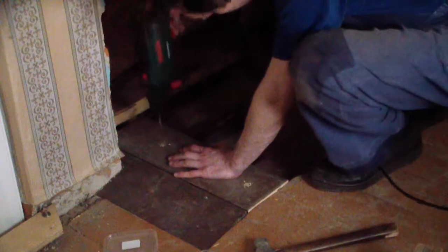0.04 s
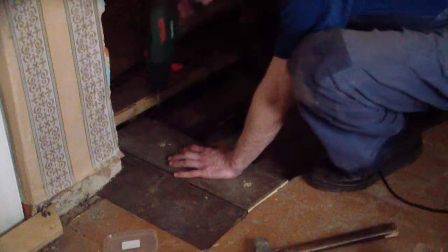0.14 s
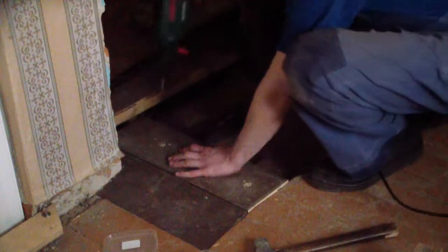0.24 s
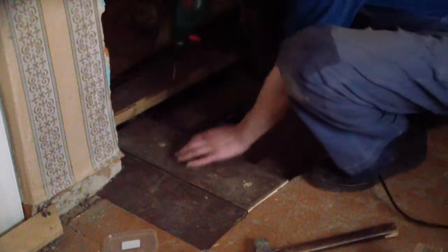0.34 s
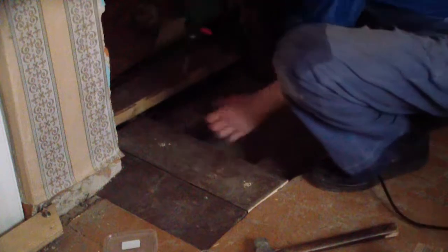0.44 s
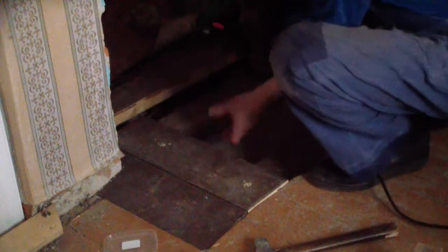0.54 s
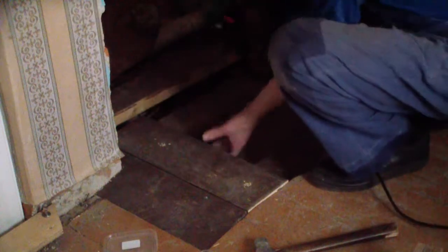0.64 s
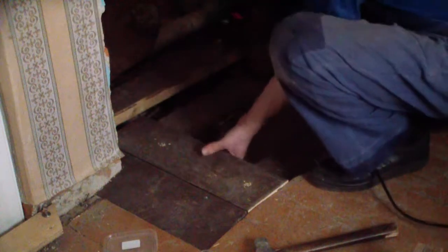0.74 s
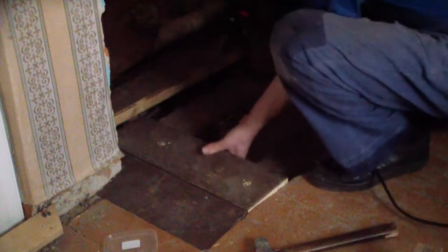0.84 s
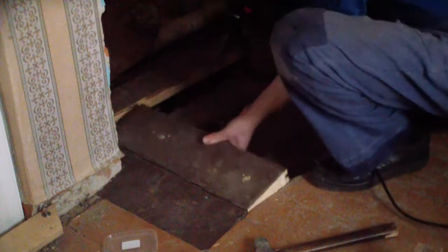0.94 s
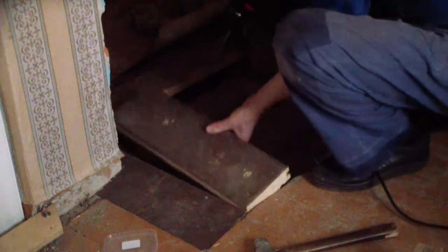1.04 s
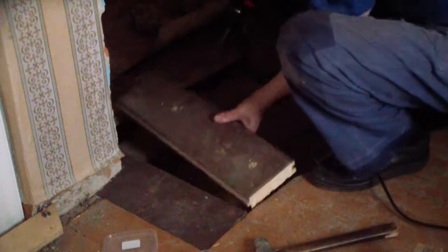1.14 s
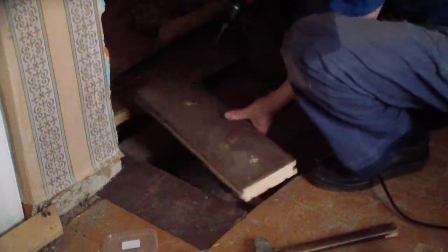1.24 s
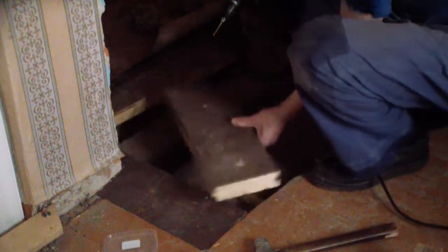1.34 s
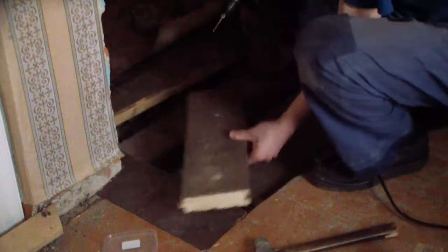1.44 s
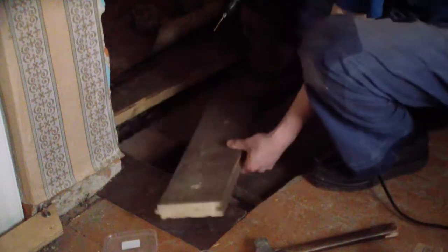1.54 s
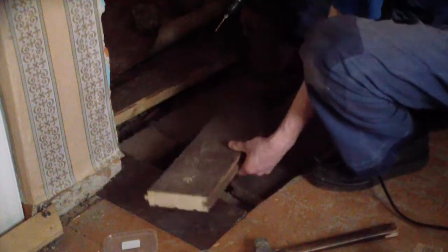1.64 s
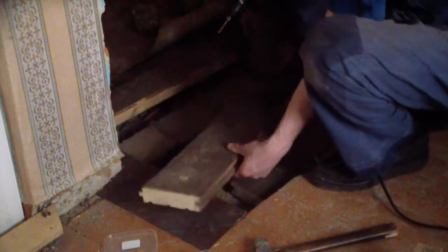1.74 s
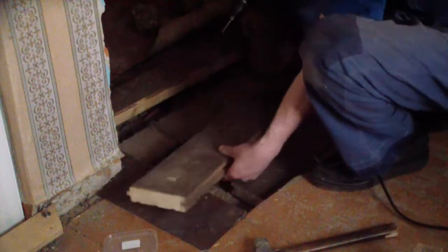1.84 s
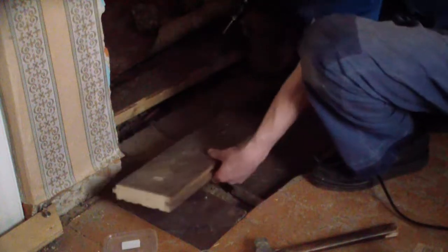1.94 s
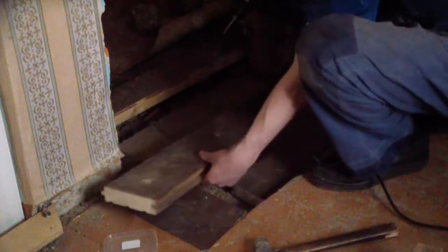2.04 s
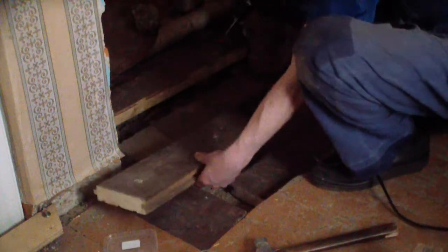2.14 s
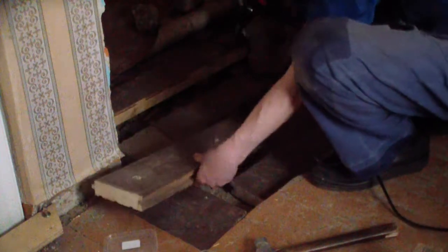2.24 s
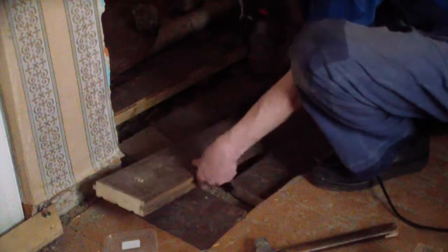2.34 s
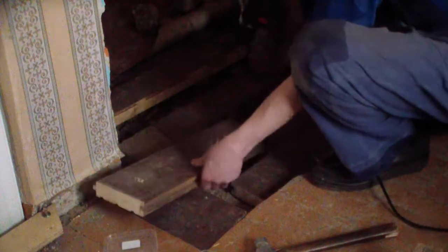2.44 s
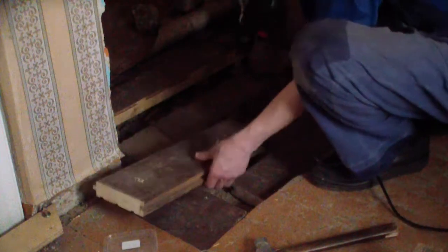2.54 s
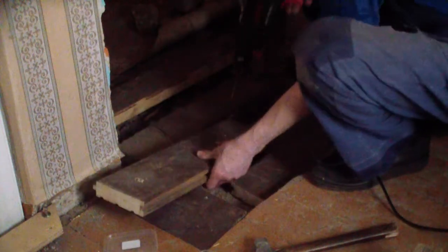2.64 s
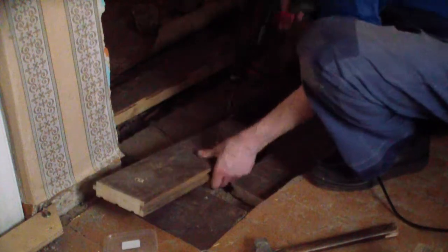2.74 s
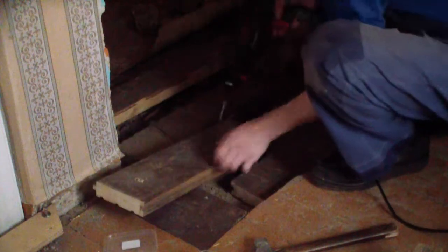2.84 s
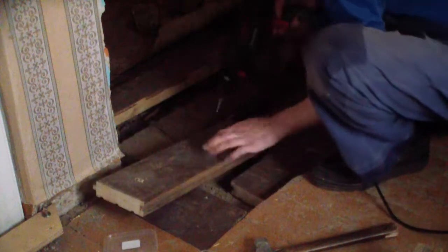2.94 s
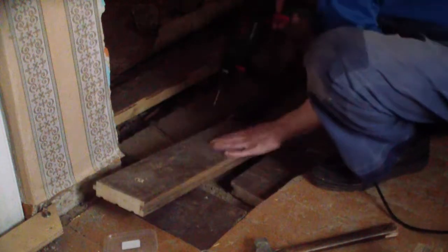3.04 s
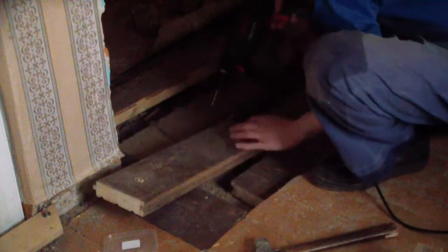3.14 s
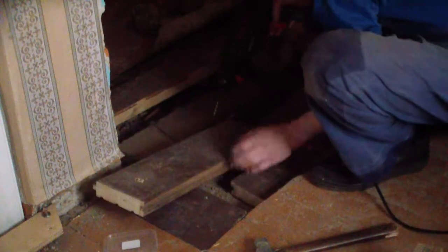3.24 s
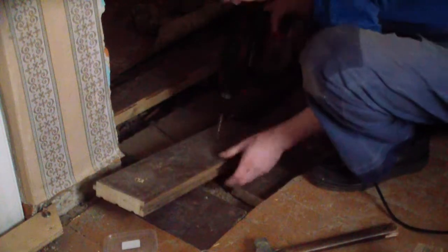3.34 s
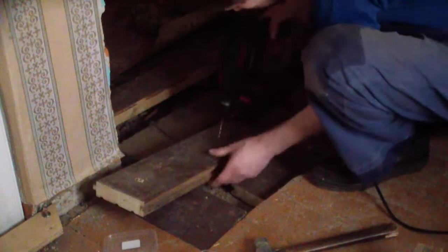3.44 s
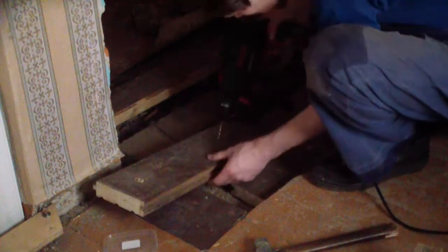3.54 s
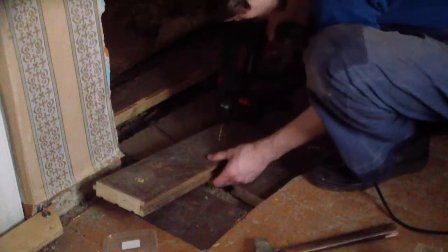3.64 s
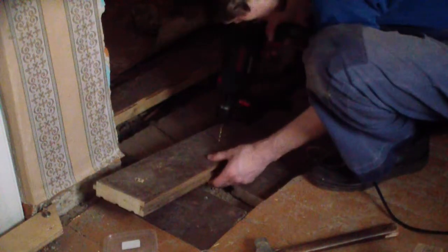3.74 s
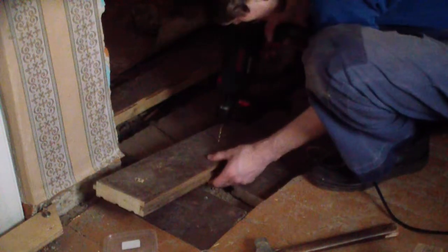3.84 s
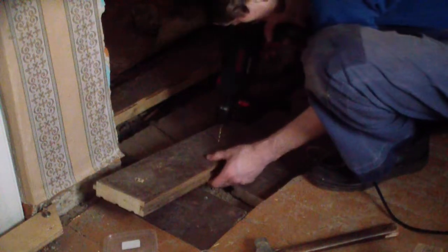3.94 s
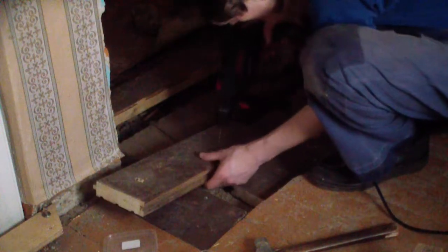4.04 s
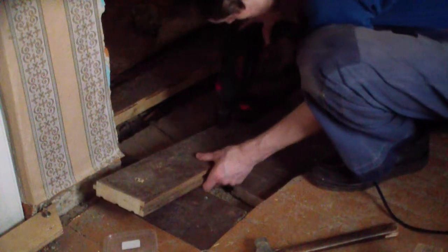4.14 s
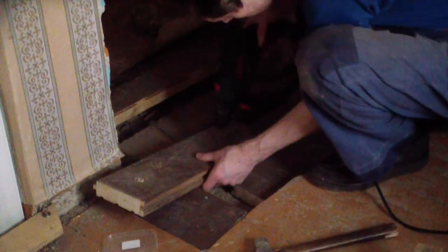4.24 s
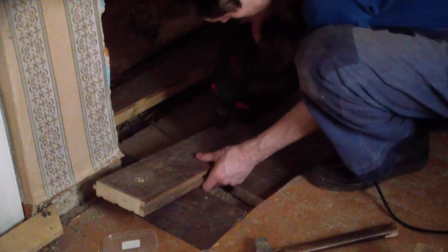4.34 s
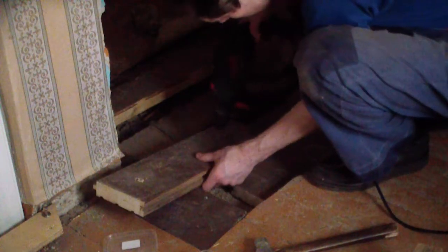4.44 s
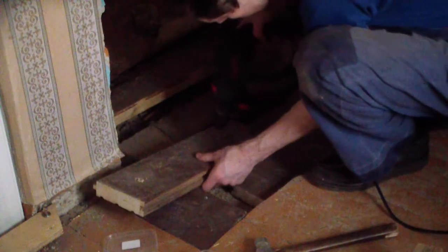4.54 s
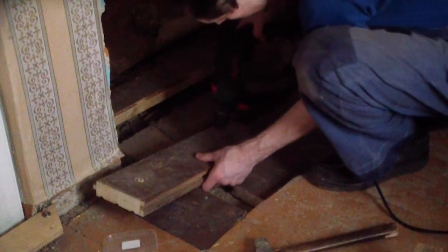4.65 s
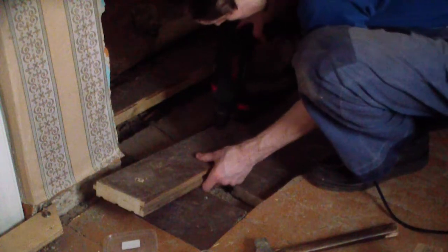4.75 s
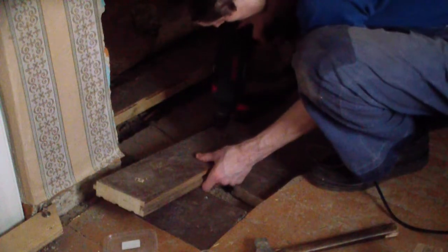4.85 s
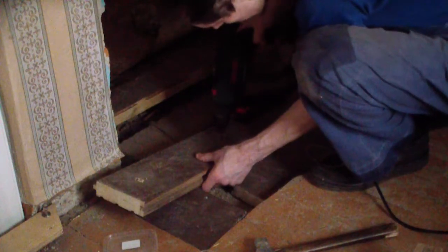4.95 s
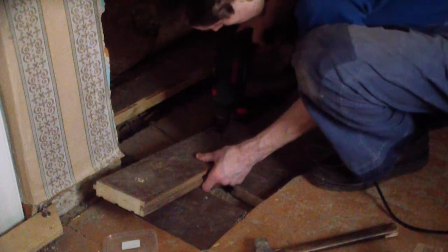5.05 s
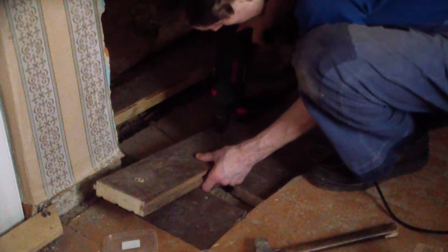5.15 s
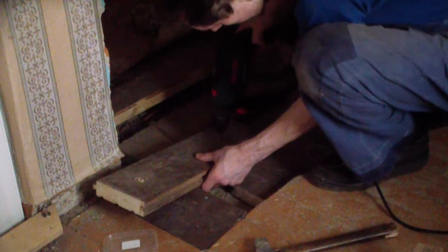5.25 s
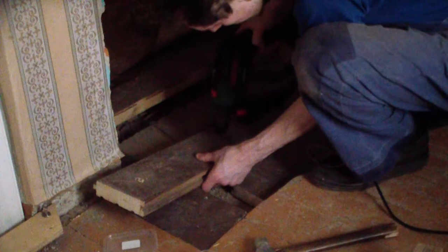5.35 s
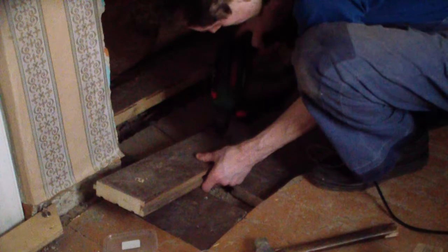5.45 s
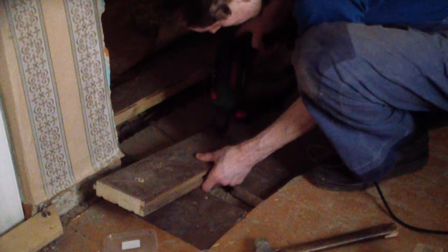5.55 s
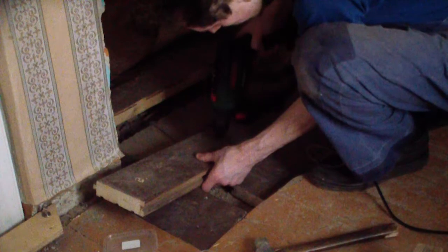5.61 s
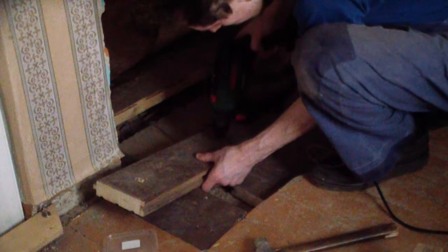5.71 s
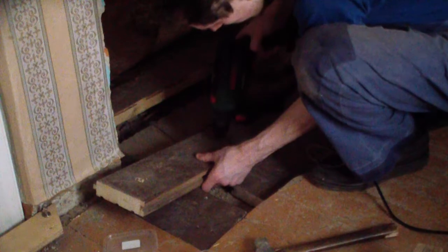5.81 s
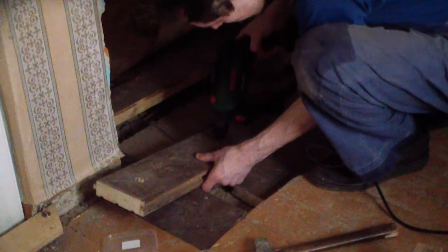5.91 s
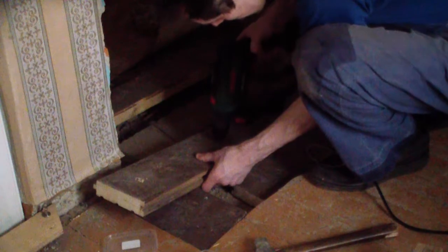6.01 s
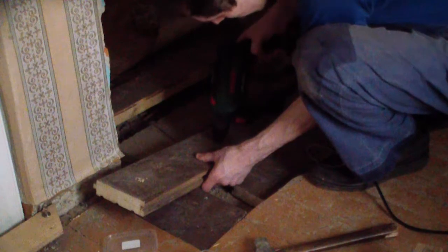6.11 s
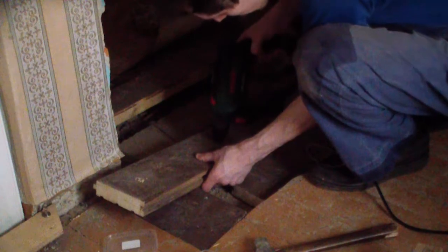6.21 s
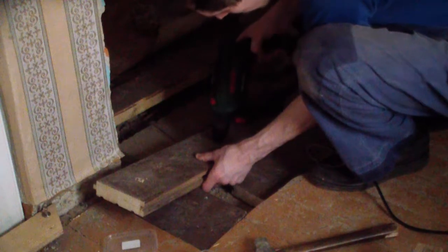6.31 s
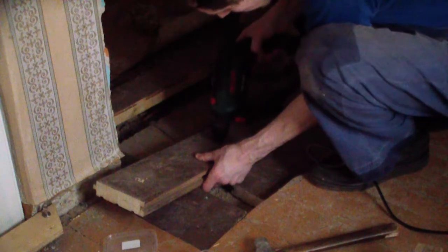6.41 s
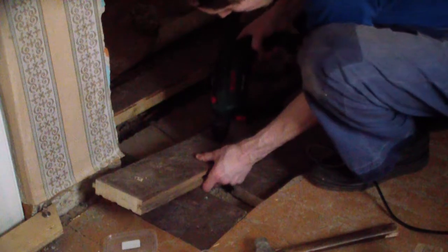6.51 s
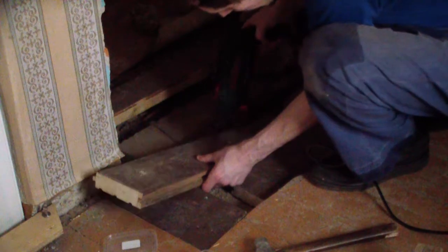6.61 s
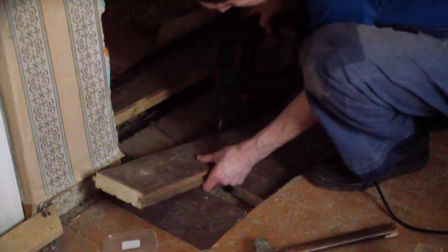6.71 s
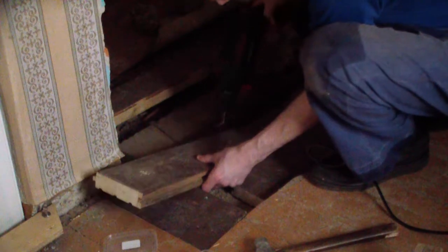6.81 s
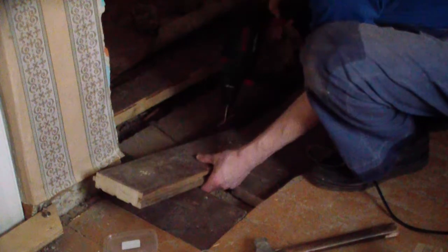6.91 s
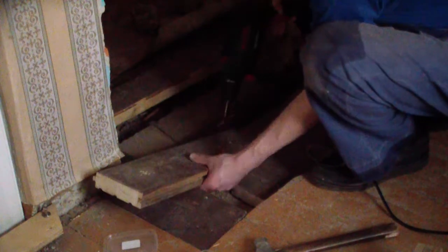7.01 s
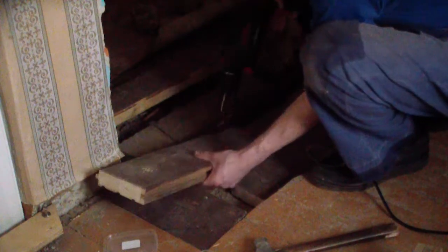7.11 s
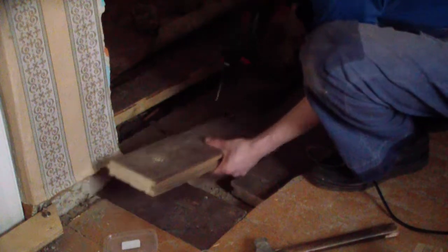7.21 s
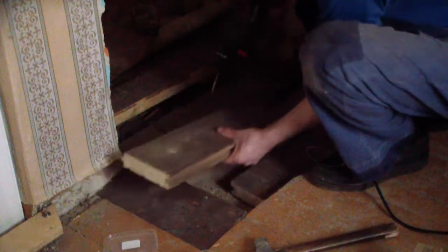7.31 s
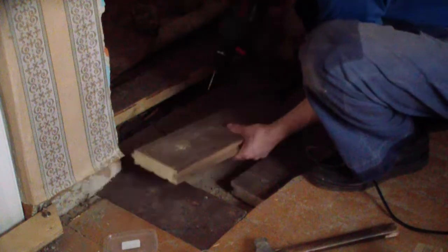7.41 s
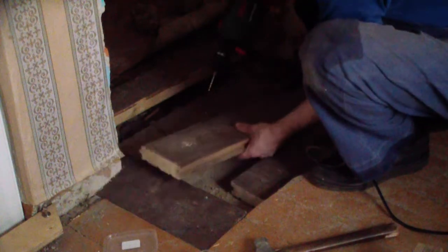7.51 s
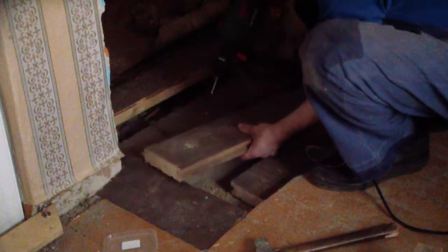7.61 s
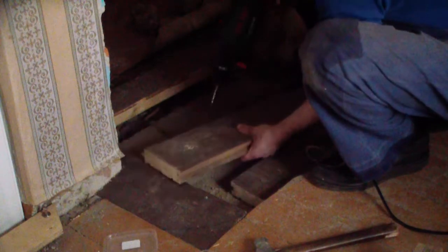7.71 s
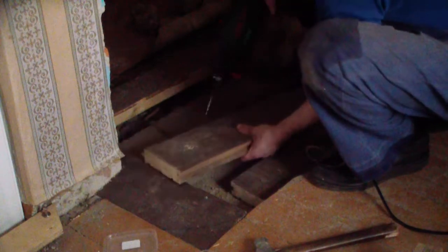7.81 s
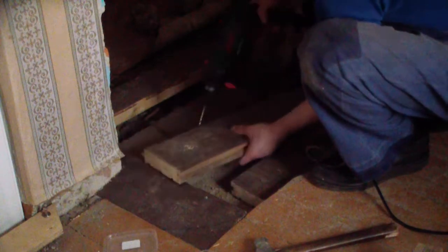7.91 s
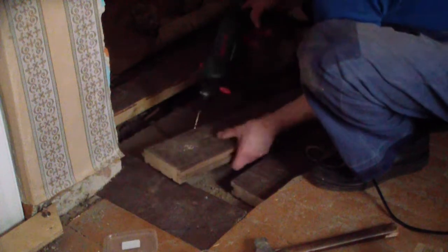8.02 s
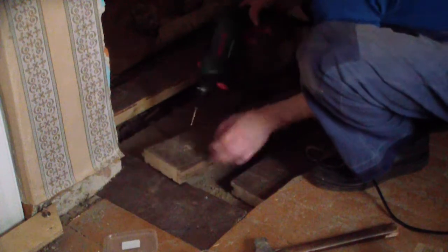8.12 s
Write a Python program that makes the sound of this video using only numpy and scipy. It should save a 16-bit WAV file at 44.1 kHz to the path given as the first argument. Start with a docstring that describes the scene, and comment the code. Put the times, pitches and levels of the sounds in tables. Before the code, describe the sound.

Wood is knocked and slid on a floor indoors before an electric drill runs briefly into it and whines down.

```python
"""Drilling a floorboard in a small room

Two microphones close to the work. A mains drill coasts to rest, its brushes squealing, while a short
board is lifted out, slid and knocked down on the wooden floor. The drill spins up: motor hum, whine
and fan rush all follow the shaft. The bit growls through the wood and the drill bumps down on it,
hard enough for the limiter to duck the motor. It coasts again as the board is set down."""
import sys
import numpy as np
from scipy import signal
from scipy.fft import rfft, irfft, next_fast_len
from scipy.io import wavfile
from scipy.ndimage import uniform_filter1d

SR = 44100
rng = np.random.default_rng(int(sys.argv[2]) if len(sys.argv) > 2 else 0)


def inscribe(sig):
    """Save sig as 16-bit PCM at rate SR to the path in sys.argv[1].

    A 1-D sig is mono; a 2-D sig holds one channel per row.
    Samples are clipped to [-1, 1] before scaling.
    """
    pcm = np.round(np.clip(np.atleast_2d(sig).T, -1, 1) * 32767)
    wavfile.write(sys.argv[1], SR, pcm.astype(np.int16))


N = 360297
T = np.arange(N) / SR
TRIGGER_S, RELEASE_S = 4.845, 6.812  # the trigger is held between these times
GEAR_RATIO = 14.02  # shaft turns per turn of the chuck
BAND_LIMIT_HZ = 15850


def amp(db):
    """Decibels to gain."""
    return 10 ** (np.asarray(db) / 20)

def unit(x):
    """Scales to an rms of 1."""
    return x / np.sqrt(np.mean(x ** 2) + 1e-20)

def read(points, hz):
    """Reads (f/Hz, value) points on a log-frequency axis."""
    f, value = np.transpose(points)
    return np.interp(np.log(hz + 1), np.log(f + 1), value)

def colour(x, points):
    """Filters by a spectrum of (f/Hz, level/dB) points."""
    size = next_fast_len(len(x))
    gain = amp(read(points, np.fft.rfftfreq(size, 1 / SR)))
    return irfft(rfft(x, size) * gain, size)[:len(x)]

def cut(x, hz, kind, order=2):
    """A low-pass or high-pass filter."""
    return signal.sosfilt(signal.butter(order, hz, kind, fs=SR, output="sos"), x)

def resonate(x, hz, width_hz):
    """Rings one resonance, at an rms of 1."""
    return unit(signal.lfilter(*signal.iirpeak(hz, hz / width_hz, SR), x))

def noise(size=N):
    """White noise."""
    return rng.standard_normal(size)

def wander(hz):
    """Random drift up to a given rate."""
    return unit(cut(noise(), hz, "low"))

def fade(s, decay_s):
    """1 until time s, then dying away."""
    return np.exp(-np.maximum(T - s, 0) / decay_s)

def add(mix, s, sound):
    """Lays a sound into the mix at time s."""
    part = mix[max(round(s * SR), 0):][:len(sound)]
    part += sound[:len(part)]

def modes(rows, size=32768, spread_db=2):
    """Rings a table of modes, in a random balance as if struck on a new spot."""
    t = np.arange(size) / SR
    weights = amp(spread_db * noise(len(rows))) * rng.choice([-1, 1], len(rows))
    x = sum(w * amp(db - 60 * t / t60) * np.sin(2 * np.pi * hz * t)
            for w, (hz, db, t60) in zip(weights, rows))
    return x / np.linalg.norm(x)

def tones(rows, turns, speed, swell_db=1.5):
    """Multiples of a rotation, each swelling on its own, silent above the band limit."""
    out = np.zeros(N)
    for multiple, db in rows:
        level = amp(db + swell_db * wander(5)) * (multiple * speed < BAND_LIMIT_HZ)
        out += level * np.sqrt(2) * np.sin(2 * np.pi * (multiple * turns + rng.random()))
    return out

def jolt(chuck_turns, decay_turns=0.35):
    """A push that dies away within each turn of the chuck; its mean is 1."""
    push = np.exp(-(chuck_turns % 1) / decay_turns)
    return push / push.mean()


# The empty room at the microphones: f/Hz, relative level/dB
ROOM_TONE = [(15, -34), (25, -4), (107, -5), (126, -9), (161, -6), (371, -10), (572, -15.5), (955, -19.5),
             (1390, -20.5), (2150, -22), (15800, -33.5)]
def room_tone():
    """A faint, low, steady background."""
    return amp(-47.5) * unit(colour(noise(), ROOM_TONE))

# How long the room and its floor ring: f/Hz, t60/s
RING_TIMES = [(100, 0.27), (400, 0.43), (1500, 0.63), (5000, 0.71), (14000, 0.36)]
def tail(size=32768):
    """Dense ringing of energy 1 that lasts longest around 5 kHz."""
    hz, t, spectrum = signal.stft(noise(size), SR, nperseg=256)
    decay = amp(-60 * t / read(RING_TIMES, hz)[:, None])
    x = signal.istft(spectrum * decay, SR, nperseg=256)[1][:size]
    return x / np.linalg.norm(x)

def room(x, wet_db):
    """Direct sound plus reflections off the nearby walls, at constant power."""
    return (x + amp(wet_db) * signal.oaconvolve(x, tail())[:N]) / np.hypot(1, amp(wet_db))

# Friction on the grain: f/Hz, relative level/dB
GRAIN_HISS = [(200, 1), (700, -3.5), (2000, -4.5), (5500, -5), (8200, -5), (12000, -8.5), (16000, -14)]
# Strokes: t/s, nominal length/s, hiss level/dB, board ring level/dB, low-pass f/Hz
SLIDE_STROKES = [(0.406, 0.2, -37, -50, 6000), (0.944, 0.11, -35, -45, 3420), (2.085, 0.12, -47, -46, 4000),
                 (2.169, 0.11, -46, -43, 4000), (2.617, 0.47, -49, -63, 6000),
                 (2.859, 0.073, -40.5, -58, 8000), (3.066, 0.068, -39, -40.5, 15000),
                 (3.225, 0.27, -50.5, -60, 5000), (3.83, 0.057, -73, -57, 5000),
                 (4.066, 0.11, -49.5, -48, 5000)]
def slides():
    """The board or a hand slides on wood, hissing and stirring the board's bending mode."""
    out = np.zeros(N)
    hiss = unit(colour(noise() * (1 + 0.18 * wander(210)), GRAIN_HISS))
    ring = resonate(noise(), hz=1590, width_hz=60)
    for s, length, hiss_db, ring_db, top_hz in SLIDE_STROKES:
        rub = amp(hiss_db) * unit(cut(hiss, top_hz, "low", order=1)) + amp(ring_db) * ring
        out += rub * np.interp(T, s + length * np.array([0, .18, .5, 1.57]), [0, 1, 1, 0])
    return out

# Weight on the floor: t/s, length/s, level/dB, top f/Hz
FLOOR_THUDS = [(0.39, 0.15, -34, 490), (0.91, 0.07, -40, 380), (2.855, 0.093, -36, 71),
               (2.858, .075, -35, 260), (3.61, 0.1, -47, 70), (3.691, 0.1, -37.5, 75),
               (4.182, 0.12, -48.5, 900), (4.85, 0.2, -36, 160), (5.051, 1.3, -47, 128),
               (6.066, 0.13, -29.5, 275), (6.64, 0.14, -29, 85), (6.642, 0.12, -12.5, 300)]
def thuds():
    """The floor gives with a dull thud under shifting weight."""
    out = np.zeros(N)
    for s, length, db, top_hz in FLOOR_THUDS:
        rumble = cut(noise(SR), top_hz, "low", order=4)
        push = unit(cut(rumble, top_hz / 2, "high"))[:int(length * SR)]
        add(out, s, amp(db) * push * signal.windows.tukey(len(push), .7))
    return out

# What a scrape rings: f/Hz at a pitch factor of 1, width/Hz, relative level/dB
SCRAPE_RESONANCES = [(790, 20, -15), (844, 18, 1), (960, 38, 3.5), (1174, 15, 6.5), (2130, 64, -5),
                     (2350, 83, -8), (2710, 100, -5), (3440, 140, -13), (4620, 210, -6.5), (5240, 160, -15),
                     (5300, 140, -26), (8260, 400, -29)]
# Two short hissing rasps, each ringing narrow resonances: t/s, length/s, level/dB, pitch factor, high-pass f/Hz
RINGING_RASPS = [(2.866, .06, -39, 1.035, 2300), (3.396, .098, -28, 1.0, 550)]
def scrapes(slips_per_s=900, rise_s=.011, fade_db_per_s=100, stop_s=.012, size=16384):
    """Quick uneven slips excite narrow resonances, hardest at the start of the stroke."""
    out, t = np.zeros(N), np.arange(size) / SR
    for s, length, db, pitch, low_hz in RINGING_RASPS:
        slips = unit(noise(size) * (rng.random(size) < slips_per_s / SR)) + 0.94 * noise(size)
        ring = sum(amp(mode_db) * resonate(slips, hz * pitch, width_hz)
                   for hz, width_hz, mode_db in SCRAPE_RESONANCES)
        stroke = np.minimum(t / rise_s, 1) * amp(db - fade_db_per_s * t)
        stroke *= np.exp(-np.maximum(t - length, 0) / stop_s)
        add(out, s, stroke * unit(cut(ring, low_hz, "high")))
    return out

# Grit, trigger, gears taking up play, splinters, chuck on board: t/s, level/dB, low f/Hz, top f/Hz
SNAPS = [(.379, -23.5, 1500, 12000), (.495, -29, 2000, 12000), (1.985, -36, 1500, 8900),
         (4.730, -26.5, 1990, 14000), (4.843, -15, 1190, 7900), (4.854, -19, 1500, 9000),
         (4.863, -12.5, 1200, 8900), (4.873, -10.5, 1480, 8900), (4.882, -16, 1500, 9000),
         (4.892, -10, 2000, 11100), (5.082, -12, 1200, 4500), (5.902, -10, 500, 5000),
         (6.647, -4, 1200, 1800)]
def clicks(t60_s=.035, size=4096):
    """Brief snaps of hard parts, each in its own band."""
    out, t = np.zeros(N), np.arange(size) / SR
    for s, db, low_hz, top_hz in SNAPS:
        band = cut(cut(noise(size), low_hz, "high"), top_hz, "low", order=4)
        add(out, s, amp(db - 60 * t / t60_s) * unit(band))
    return out

# Modes of the wooden floor: f/Hz, relative level/dB, t60/s
FLOOR_MODES = [(103.6, 0, 0.42), (143, 4, 0.25), (183.3, 1.5, 0.4), (236.6, -6, 0.2), (295, -2, 0.39),
               (325, 2, 0.26), (413.7, -0.5, 0.32), (480, 2.5, 0.15), (587, -1.5, 0.36), (694, -9, 0.57)]
# The dense ringing between them: f/Hz, relative level/dB
FLOOR_BODY = [(40, -21), (90, -5), (160, 1.5), (450, -2), (700, -7.5), (1000, -14.5), (1700, -15.5),
              (3000, -23.5), (8000, -19), (15000, -12.5)]
def floor_strike(hard_hz, low_hz):
    """One contact rings the floor; a soft one is dull, a brief one leaves the joists still."""
    blow = tail()
    blow[0] += 0.27  # the contact itself, ahead of its ringing
    body = colour(np.pad(blow, (256, 0)), FLOOR_BODY)[256:]
    ring = body / np.linalg.norm(body) + amp(-4) * modes(FLOOR_MODES)
    dulled = amp(1) * cut(ring, hard_hz, "low") + amp(-9) * cut(ring, hard_hz, "low", order=1)
    return cut(dulled, low_hz, "high")

# Modes of the loose board: f/Hz, relative level/dB, t60/s
BOARD_MODES = [(1573, 7, 0.27), (1590, -3, 0.34), (1985, -4.5, 0.16), (2620, -14, 0.28)]
# Blows: t/s, relative floor level/dB, low-pass f/Hz, high-pass f/Hz, relative board level/dB
BOARD_BLOWS = [(.964, -24, 500, 195, -52), (.976, -15.5, 800, 190, -33), (1.011, -15, 623, 120, -35),
               (1.021, -20, 500, 120, -47), (1.033, -17.5, 420, 100, -44), (1.040, -15, 330, 90, -50),
               (1.082, -19.5, 355, 110, -48), (2.008, -16.5, 1680, 295, -26.5), (2.072, -21, 800, 300, -45),
               (2.119, -20.5, 240, 80, -50), (2.313, -12, 2530, 350, -19.5), (2.371, -11.5, 480, 130, -36),
               (2.391, -13.5, 383, 100, -48), (2.416, -16, 1000, 170, -21), (2.453, -16.5, 590, 150, -31),
               (2.528, -27.5, 740, 200, -43), (6.647, -1.5, 1500, 259, -22), (6.658, -3, 700, 300, -37),
               (6.680, -9, 480, 115, -38), (6.697, -10.5, 650, 131, -40), (6.733, -14.5, 600, 150, -45),
               (7.621, -17, 403, 150, -50), (7.640, -14.5, 400, 220, -50), (7.718, -14.5, 387, 130, -50),
               (7.733, -15.5, 300, 100, -50), (7.767, -16, 406, 130, -50), (7.790, -23, 343, 140, -48)]
def knocks():
    """The board lands, rocks and settles; each blow rings the floor and the board itself."""
    out = np.zeros(N)
    for s, floor_db, hard_hz, low_hz, board_db in BOARD_BLOWS:
        floor = amp(floor_db + 27) * floor_strike(hard_hz, low_hz)
        add(out, s, floor + amp(board_db + 25.5) * modes(BOARD_MODES))
    return out

# Course of the squeal: t/s, f/Hz, relative level/dB
BRUSH_SQUEAL = [(0.55, 1275, -44), (0.574, 1300, -42), (0.586, 1220, -47), (0.604, 1298, -42),
                (0.804, 1243, -44), (0.836, 1314, -49), (0.886, 1214, -51), (0.918, 1289, -45),
                (0.94, 1350, -59)]
def brush_squeal():
    """The brushes stick and slip on the commutator as the rotor stops."""
    times, hz, db = np.transpose(BRUSH_SQUEAL)
    cycles = np.cumsum(np.interp(T, times, hz) * (1 + 0.041 * wander(160))) / SR
    gate = np.interp(T, [times[0] - .02, times[0], times[-1], times[-1] + .02], [0, 1, 1, 0])
    stutter = np.maximum(1 + 0.3 * wander(32), 0)
    return gate * amp(np.interp(T, times, db) + 2) * stutter * np.sin(2 * np.pi * cycles)

def coast(t, start_hz, friction_hz_per_s, drag_per_s=.14):
    """Shaft speed t seconds into a coast: friction and air drag bring it to rest."""
    offset = friction_hz_per_s / drag_per_s
    return np.maximum((start_hz + offset) * np.exp(-drag_per_s * t) - offset, 0)

# The shaft's speed while the bit cuts: t/s, f/Hz
LOADED_SPEED = [(5.27, 517.8), (5.462, 507.7), (5.72, 508.8), (6.058, 518.4), (6.242, 510.0),
                (6.398, 519.1), (6.62, 516.1), (6.81, 527.6)]
def shaft_speed(free_hz=527, spin_up_s=.104):
    """Turns a second: the shaft coasts to rest, runs up, sags under load and coasts again."""
    first_coast = coast(T, start_hz=241, friction_hz_per_s=277)
    run_up = free_hz * (1 - fade(TRIGGER_S, spin_up_s))
    loaded = np.interp(T, *np.transpose(LOADED_SPEED))
    last_coast = coast(T - RELEASE_S, free_hz, friction_hz_per_s=261)
    return first_coast + np.minimum.reduce([run_up, loaded, last_coast])

def drill_level(speed):
    """The drill is louder the faster it turns, and drops a little once the trigger is let go."""
    return amp(-22.75 + 2.5 * fade(RELEASE_S, .11)) * (speed / speed.max()) ** 0.76

# Close to the drill, each as f/Hz, relative level/dB: fan and gears at full speed, slow gears, sparks
FAN_RUSH = [(35, -42), (60, -17), (436, -8.5), (576, -9), (663, -5.5), (1030, -9), (1330, -12), (1570, -4),
            (1760, -8.5), (3090, -7.5), (3810, -7.5), (7000, -7.5), (10900, -16), (12500, -10.5),
            (14700, -32), (15800, -35)]
SLOW_GEARS = [(88, -49), (150, -36), (244, -5), (321, 0), (598, -10.5), (1090, 3), (1410, 0), (2300, 1.5),
              (3200, 5.5), (4040, -5), (4910, -3), (5960, -9), (11800, -9.5), (15800, -19)]
BRUSH_SPARKS = [(500, -30), (2500, -7), (5000, 0), (10500, 0), (12800, 7), (13700, -11), (15800, -16)]
def fan_gears_brushes(speed):
    """Fan rush at speed, gear rattle when slow and brush hiss under power, heard in the room."""
    chuck_turns = np.cumsum(speed) / SR / GEAR_RATIO
    fast = (speed / speed.max()) ** 2.6
    teeth = unit(noise() * (rng.random(N) < 5 * speed / SR))
    rush = unit(noise() + 0.5 * teeth) * (1 + 0.049 * wander(45))
    rush *= .95 + .05 * jolt(chuck_turns)  # loose teeth clatter harder once a turn
    fan = amp(-2.5) * np.sqrt(fast) * unit(colour(rush, FAN_RUSH))
    gears = amp(-4.5) * np.sqrt(1 - fast) * unit(colour(rush, SLOW_GEARS))
    powered = (T > TRIGGER_S) * fade(RELEASE_S, .11)
    brushes = amp(-6) * fast * powered * unit(colour(noise(), BRUSH_SPARKS))
    return room(drill_level(speed) * (fan + gears + brushes), wet_db=-2.5)

# Rotor hum, then the whine of armature slots and commutator bars: shaft multiple, relative level/dB
ROTOR_HUM = [(1, -7), (2, -1), (3, -3.5), (4, -3), (5, -3.5), (6, -3.5), (7, -4), (9, -12), (10, -11),
             (18, -14), (20, -14)]
SLOT_WHINE = [(4, -18), (8, -8), (16, -10.5), (20, -22), (24, -9.5), (26, -22), (28, -20), (32, -12),
              (40, -14), (44, -23), (48, -14.5), (56, -14.5), (64, -15), (72, -17), (80, -19)]
# Resonances of the plastic housing, which the whine sweeps through: f/Hz, relative level/dB
HOUSING_RESPONSE = [(600, -4.5), (900, -7), (1080, 9.5), (1300, -1), (1700, -3), (2300, -3), (2750, 2),
                    (3100, 6.5), (3350, 2), (3900, -3), (4300, 2.5), (4600, -1), (5000, 4), (5500, -1),
                    (7000, -3), (8300, 3.5), (10000, -3), (12400, 2), (15000, -1)]
def motor(speed, turns, fan_blades=13, whine_full_hz=160):
    """The rotor hums under power; blade tone and whine come forward with the current off."""
    share = speed / speed.max()
    fast = share ** 1.8
    powered = (T > TRIGGER_S) * fade(RELEASE_S, .2)
    hum = amp(-10.5) * fast * powered * tones(ROTOR_HUM, turns, speed)
    blades = cut(tones([(fan_blades, -8)], turns, speed), 4000, "high", order=3)
    blades *= 1 - powered * (1 - .7 * fast)
    whine = amp(-1) * colour(tones(SLOT_WHINE, turns, speed), HOUSING_RESPONSE)
    whine *= share ** .25 * np.minimum(speed / whine_full_hz, 1)
    whine *= 1 - powered * (.7 - .35 * share)
    flutter = .75 + .25 * jolt(turns / GEAR_RATIO) + .33 * wander(110)
    return drill_level(speed) * (hum + blades + whine) * flutter

# The bit's way through the wood: t/s, relative growl level/dB, relative chatter level/dB
BIT_FEED = [(5.05, -38, -43), (5.088, -34, -33.5), (5.22, -37, -40), (5.434, -35, -38.5),
            (5.496, -29, -35.5), (5.604, -30, -35.5), (5.674, -34, -39), (5.696, -33, -32),
            (5.722, -27, -30), (6.138, -26, -26), (6.216, -33.5, -30.5), (6.448, -21.5, -38),
            (6.496, -23, -45), (6.62, -31.5, -43)]
# The cutting growl, then the lower chatter: chuck multiple, relative level/dB
GROWL_TONES = [(16, -1), (44, -16)]
CHATTER_TONES = [(9, 3), (11, -11), (13, 2.5)]
# What the bit rings, the board's bending mode and a rasp: f/Hz, width/Hz, relative level/dB
BIT_RATTLE = [(1590, 95, -32), (3020, 320, -31.5)]
def bit(speed, turns, grab_s=6.71, grab_width_s=.057, grab_db=20, breakthrough_s=6.75):
    """The bit growls, chatters and throws chips, then grabs just before it breaks through."""
    chuck_turns, chuck_hz = turns / GEAR_RATIO, speed / GEAR_RATIO
    boring = (T > TRIGGER_S) * (speed / speed.max()) ** 1.8 * fade(breakthrough_s, .025)
    grab = amp(grab_db * np.exp(-((T - grab_s) / grab_width_s) ** 2))
    times, growl_db, chatter_db = np.transpose(BIT_FEED)
    feed = grab * amp(np.interp(T, times, growl_db))
    edges = chuck_turns + .003 * wander(16)  # the cutting edges catch unevenly on the grain
    growl = amp(1) * feed * tones(GROWL_TONES, edges, chuck_hz, swell_db=0) * (1 + 0.47 * wander(45))
    chatter = amp(np.interp(T, times, chatter_db) - 4.5)
    chatter *= tones(CHATTER_TONES, edges, chuck_hz, swell_db=0)
    chips = amp(-12.5) * feed * unit(signal.oaconvolve(noise(), modes(FLOOR_MODES))[:N])
    # the wobbling bit rattles against the board once a turn
    rattle = sum(amp(db) * resonate(noise() * (.5 + jolt(chuck_turns)), hz, width_hz)
                 for hz, width_hz, db in BIT_RATTLE)
    return boring * (growl + chatter + chips + rattle)

# Stereo width of the nearby work, then of the room tone: f/Hz, side minus mid level/dB
WORK_WIDTH = [(25, -12), (60, -22), (110, -41), (380, -31), (700, -20), (1290, -17), (2380, -16),
              (4400, -9), (8120, -3), (15000, -7)]
ROOM_WIDTH = [(60, -5.5), (150, -8.5), (380, -8), (950, -5), (2380, -2.5), (5980, -1), (15000, -2)]
# Balance of the microphones: f/Hz, left minus right level/dB
MIC_BALANCE = [(100, 0.65), (2000, 0.5), (5000, 1.2), (14000, 1.4)]
def scene():
    """All sources reach two closely spaced microphones, which differ mostly in the treble."""
    speed = shaft_speed()
    turns = np.cumsum(speed * (1 + 0.0018 * wander(72))) / SR
    running, cutting = motor(speed, turns), bit(speed, turns)
    near = room(running, wet_db=-4) + room(cutting + brush_squeal(), wet_db=-9.5)
    near += room(scrapes(), wet_db=-8) + room(clicks(), wet_db=0.5)
    near += room(slides() + thuds(), wet_db=-5) + knocks()
    scatter = noise(4096) * np.exp(-np.arange(4096) / 1200)  # smears the phase for the side signal
    scattered = amp(0.5) * signal.oaconvolve(near, scatter / np.linalg.norm(scatter))[:N]
    mid = near + fan_gears_brushes(speed) + room_tone()
    side = colour(scattered + fan_gears_brushes(speed), WORK_WIDTH) + colour(room_tone(), ROOM_WIDTH)
    left = colour(mid + side, np.array(MIC_BALANCE) * [1, .5])
    right = colour(mid - side, np.array(MIC_BALANCE) * [1, -.5])
    return np.array([left, right])

def record(dry, threshold_db=-14, recovery_db_per_s=75):
    """Behind the microphones: a limiter that ducks at once and recovers, clipping, a band limit."""
    power = abs(uniform_filter1d((dry ** 2).mean(0), size=256, origin=127))
    power_db = 10 * np.log10(power + 1e-12)
    recovery = T * recovery_db_per_s
    held_db = np.maximum.accumulate(power_db + recovery) - recovery
    duck_db = uniform_filter1d(np.maximum(held_db - threshold_db, 0), size=64)
    limited = np.clip(dry * amp(-duck_db), -1, 1)
    low_pass = signal.firwin(511, BAND_LIMIT_HZ, window=("kaiser", 9), fs=SR)
    return signal.oaconvolve(limited, low_pass[None], "same")


dry = scene()
out = record(dry)
inscribe(out)
```